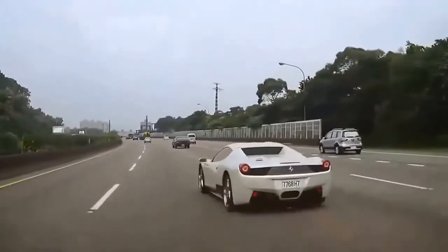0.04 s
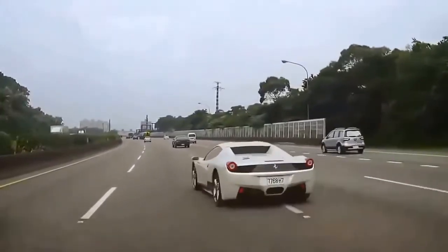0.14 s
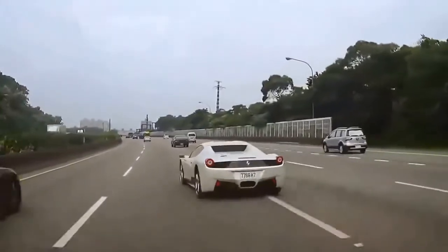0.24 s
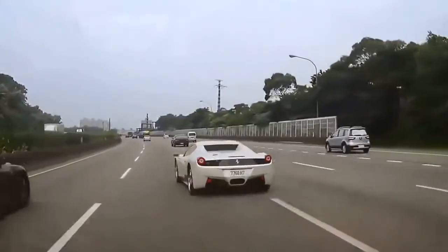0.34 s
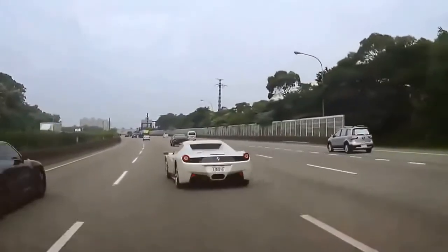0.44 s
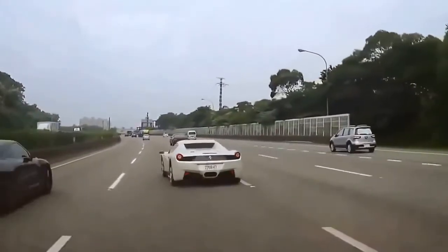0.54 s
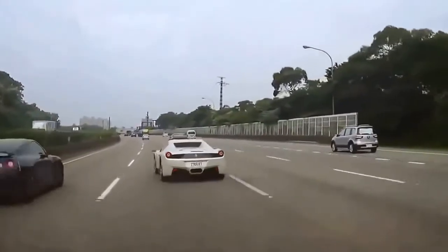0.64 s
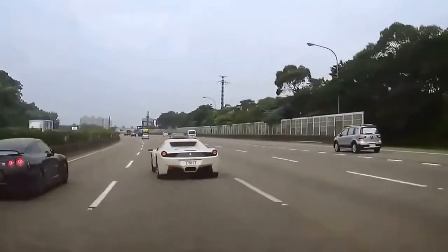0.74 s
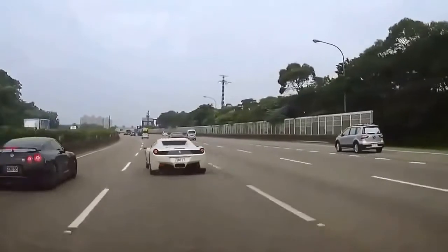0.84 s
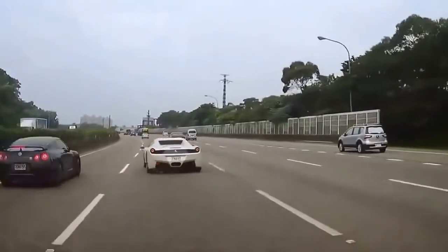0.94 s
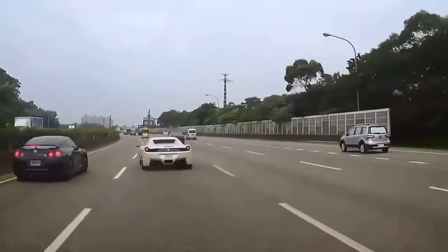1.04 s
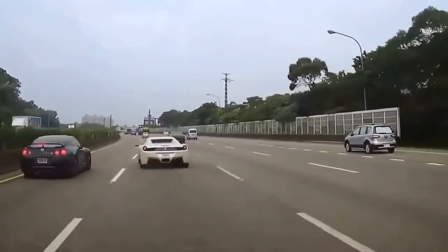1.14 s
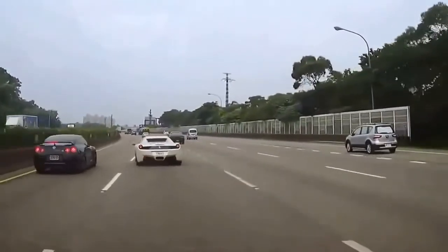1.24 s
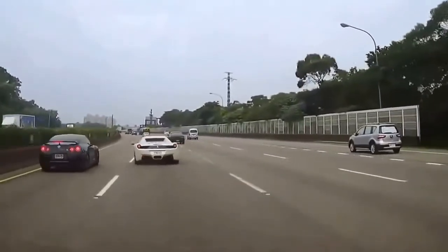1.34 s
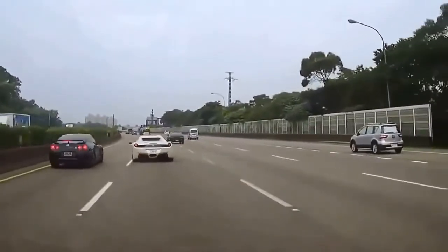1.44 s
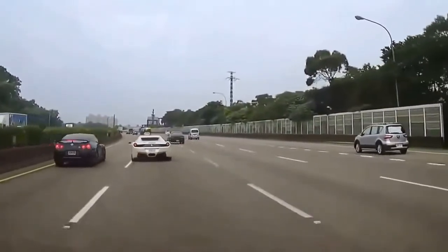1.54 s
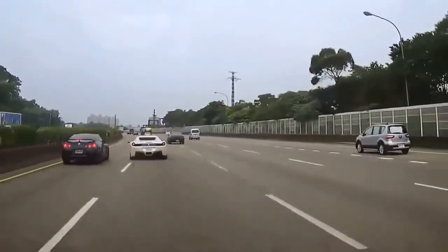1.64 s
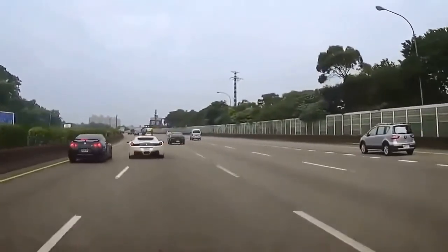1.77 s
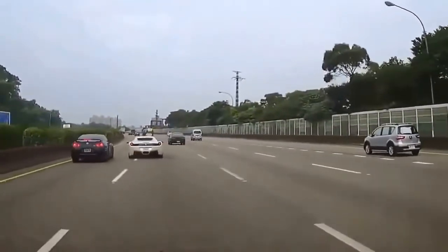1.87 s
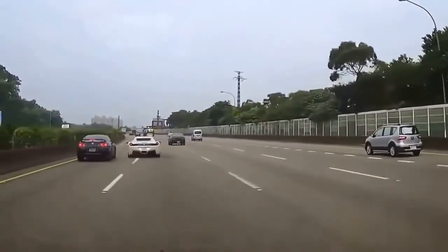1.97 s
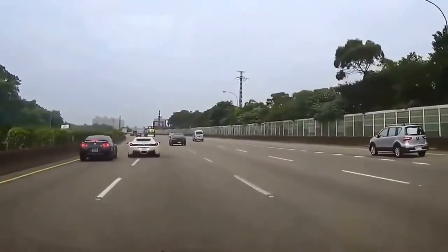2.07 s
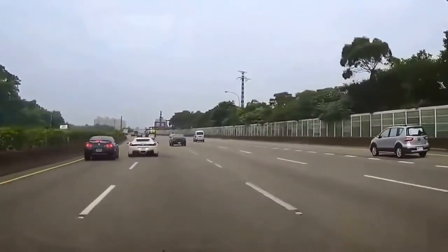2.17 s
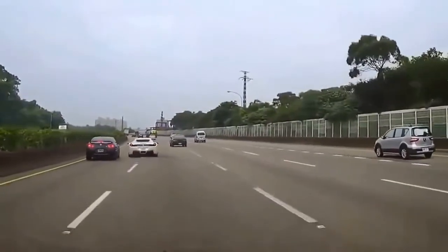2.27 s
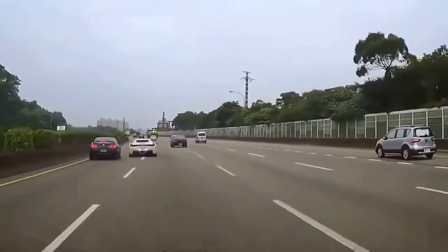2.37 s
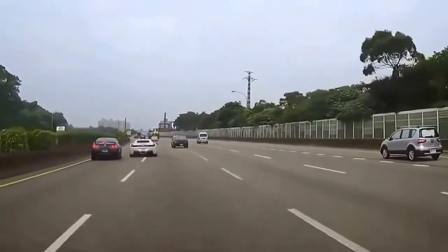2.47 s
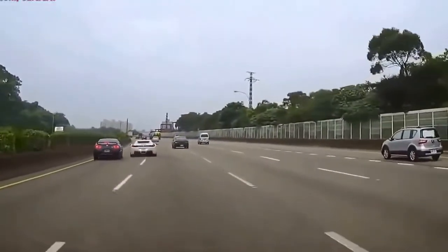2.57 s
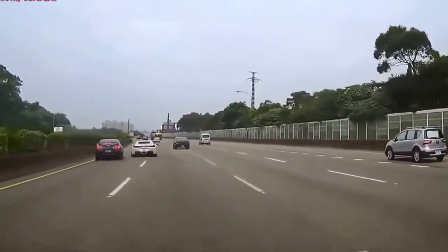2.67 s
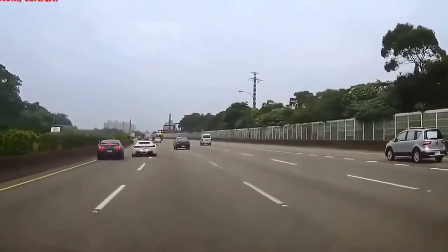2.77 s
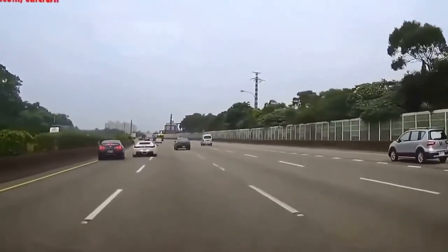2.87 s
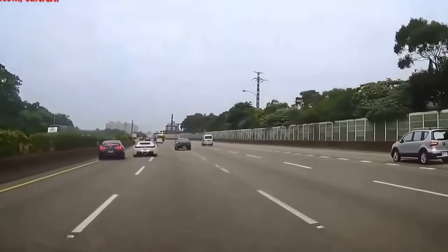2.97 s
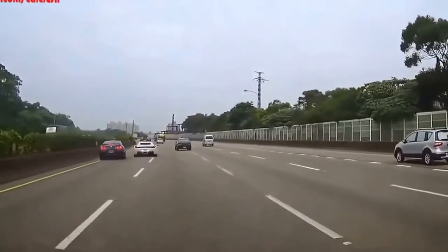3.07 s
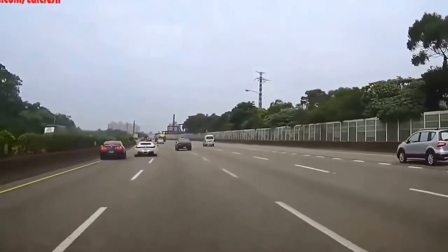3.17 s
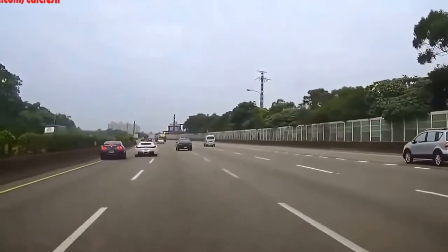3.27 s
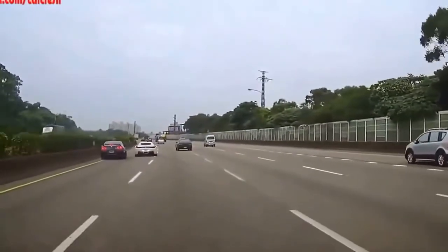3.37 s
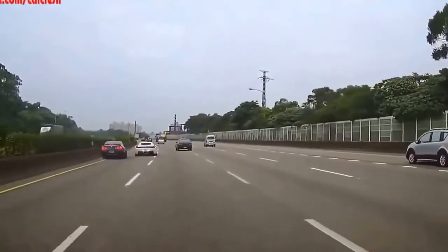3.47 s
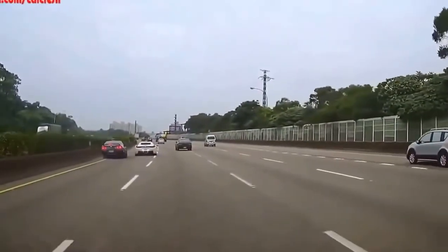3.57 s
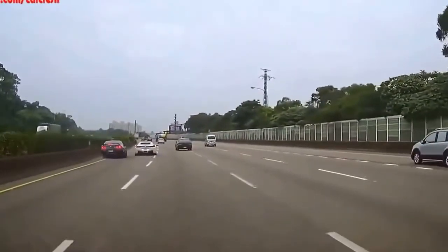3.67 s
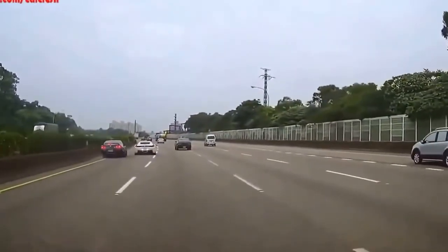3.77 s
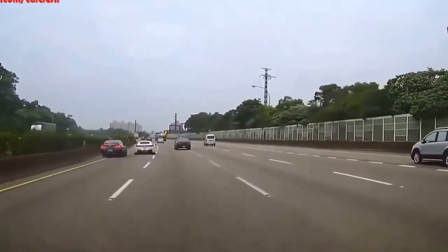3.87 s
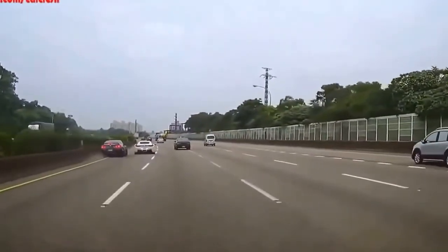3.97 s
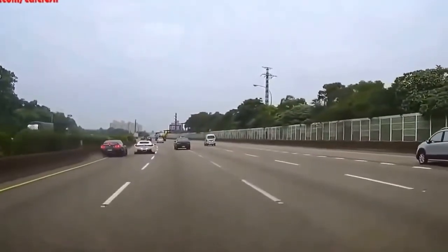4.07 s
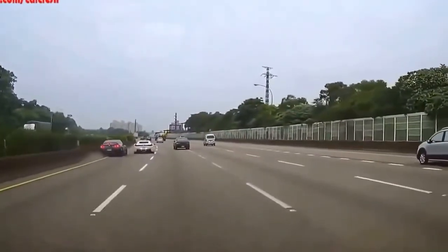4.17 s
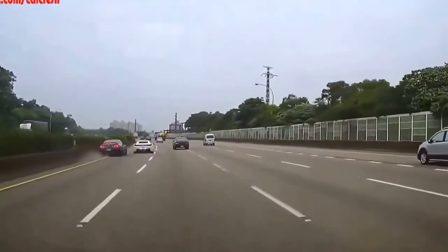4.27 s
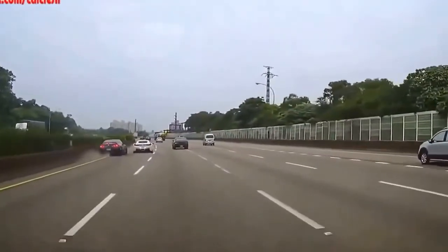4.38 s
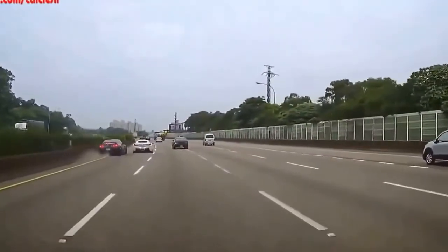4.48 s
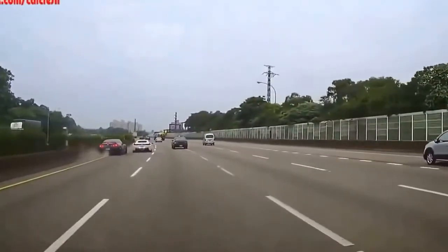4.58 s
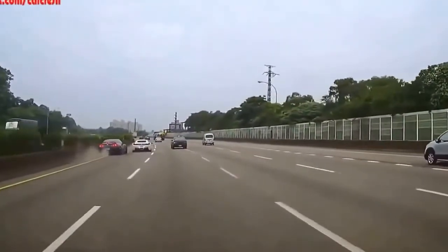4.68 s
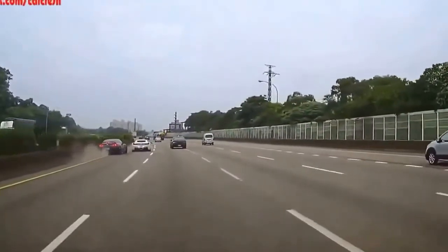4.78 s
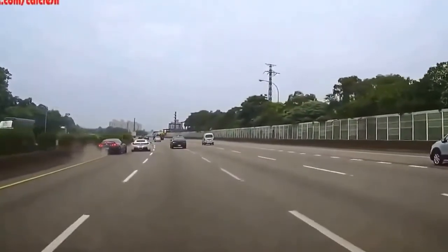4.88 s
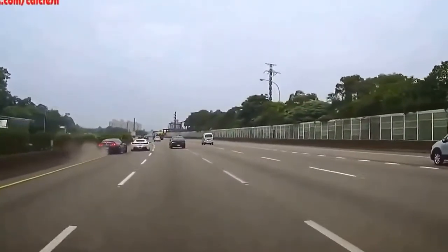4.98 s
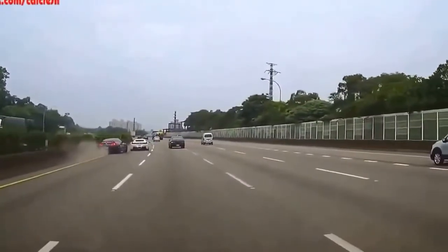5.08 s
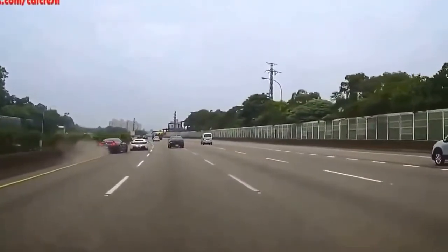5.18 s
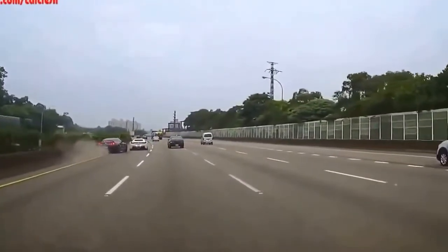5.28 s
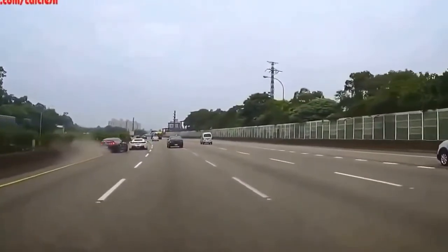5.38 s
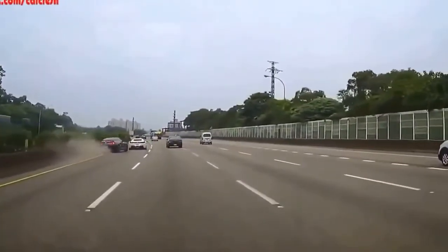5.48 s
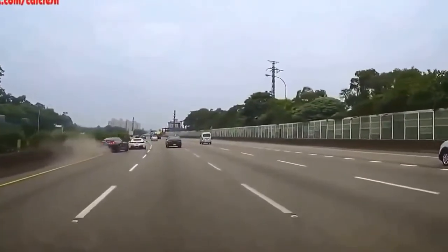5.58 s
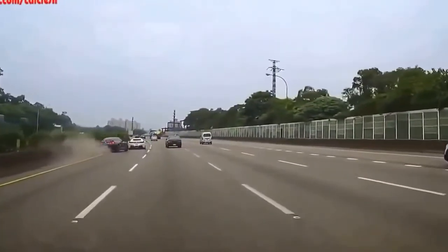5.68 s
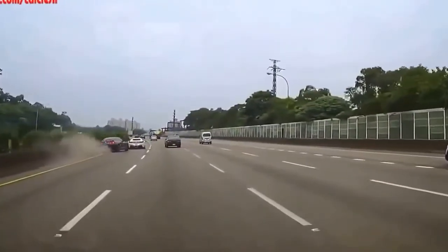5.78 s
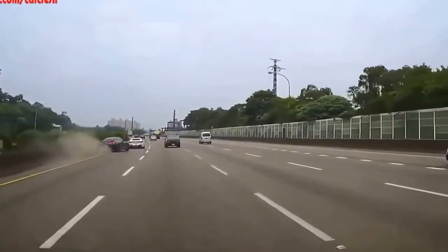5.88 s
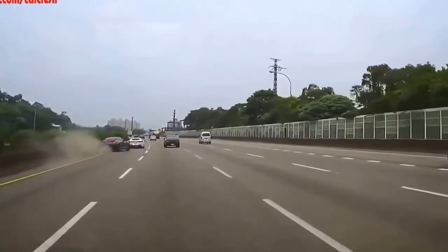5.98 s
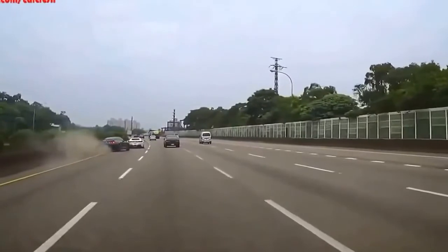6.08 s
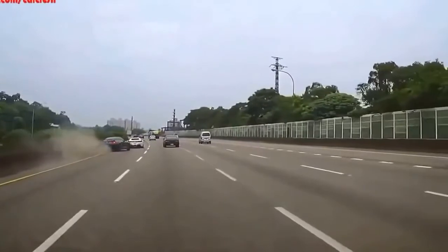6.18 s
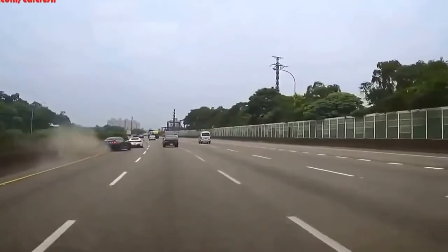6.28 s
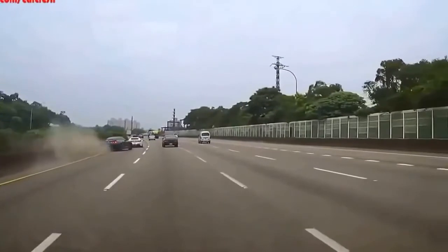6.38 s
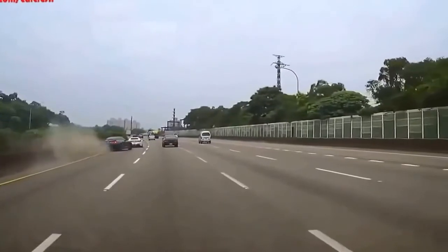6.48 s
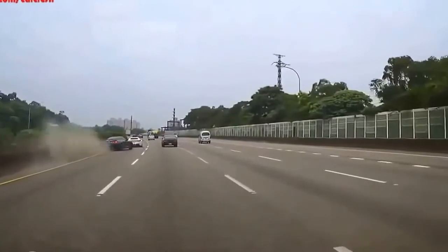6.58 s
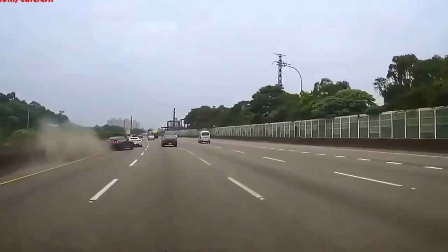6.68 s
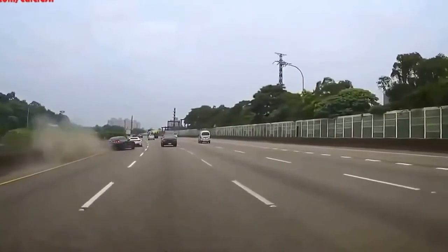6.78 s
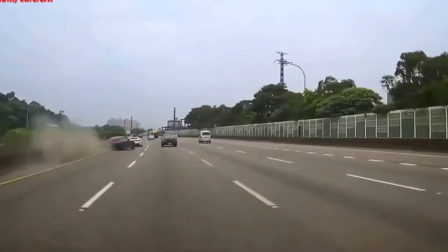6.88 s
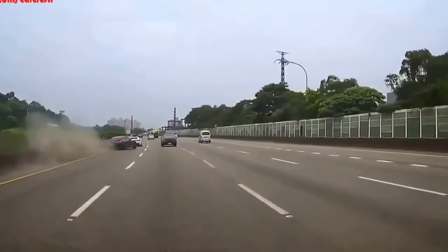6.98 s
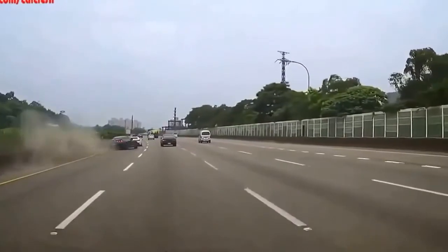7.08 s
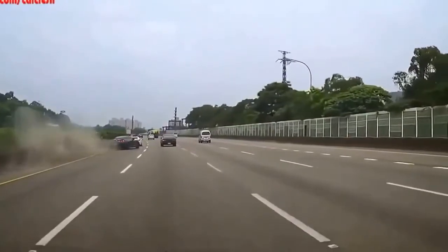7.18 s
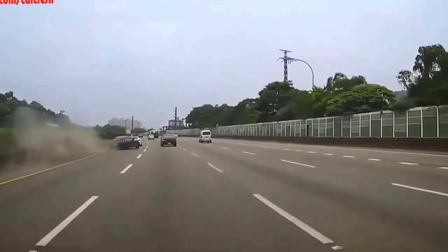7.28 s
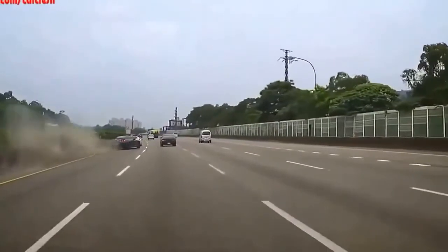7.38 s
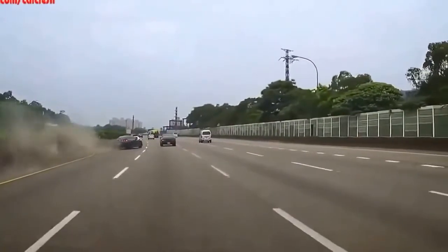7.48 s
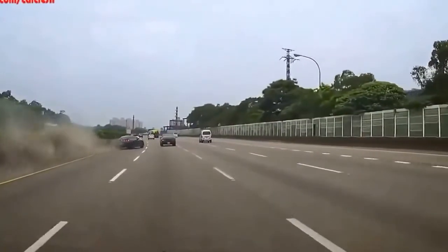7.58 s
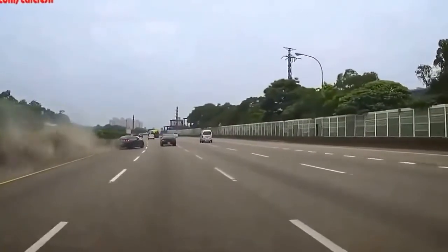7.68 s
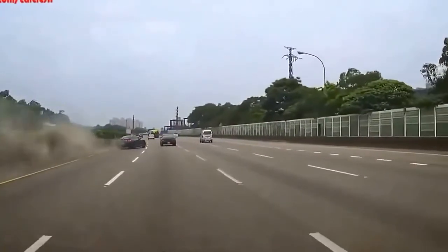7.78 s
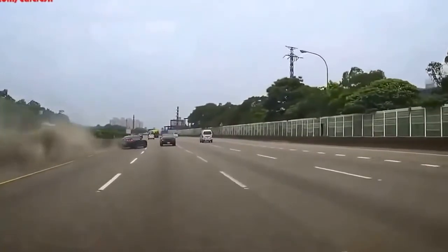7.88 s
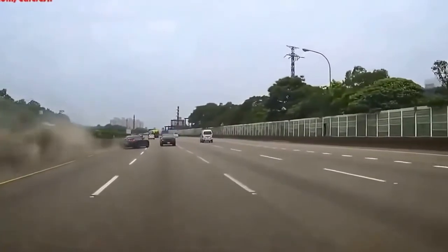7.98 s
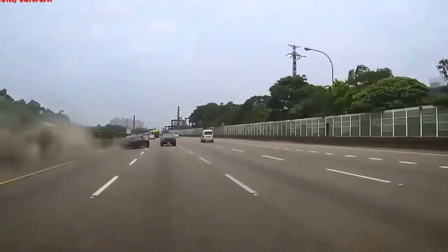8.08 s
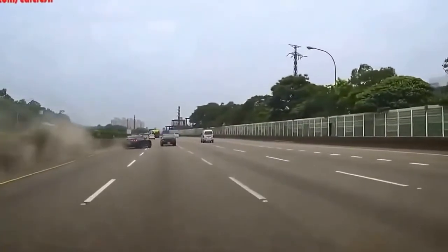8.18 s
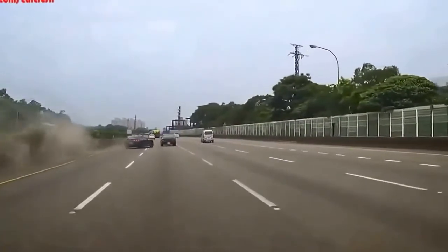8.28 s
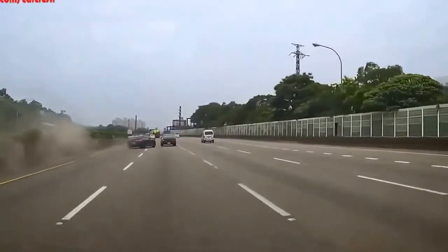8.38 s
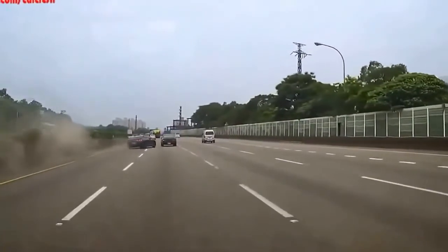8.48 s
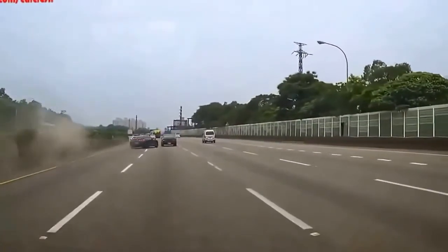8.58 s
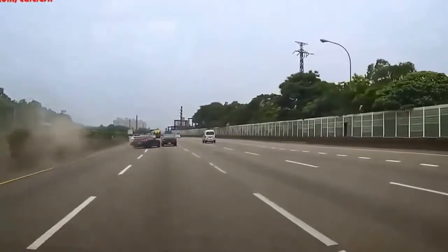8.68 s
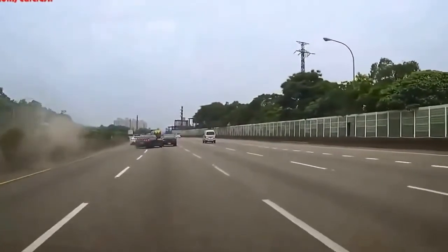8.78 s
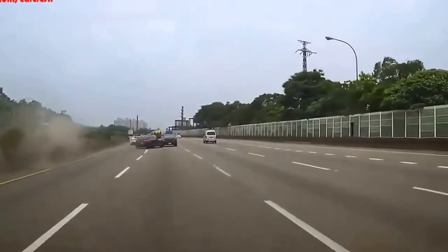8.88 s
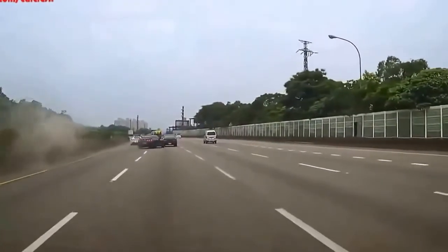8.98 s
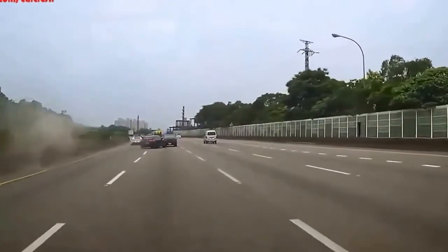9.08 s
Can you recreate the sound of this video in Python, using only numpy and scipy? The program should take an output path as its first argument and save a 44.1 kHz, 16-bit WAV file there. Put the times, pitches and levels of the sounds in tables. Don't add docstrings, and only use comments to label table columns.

```python
import sys
import numpy as np
from scipy import signal
from scipy.fft import rfft, irfft, next_fast_len
from scipy.io import wavfile
from scipy.ndimage import uniform_filter1d

SR = 44100
rng = np.random.default_rng(int(sys.argv[2]) if len(sys.argv) > 2 else 0)


def transcribe(u):
    v = np.clip(np.atleast_2d(u).T, -1, 1)
    q = np.round(v * 32767).astype(np.int16)
    wavfile.write(sys.argv[1], SR, q)


def level_to_linear(level):
    exponent = np.asarray(level, float) / 20
    return 10 ** exponent


N = 402633
CUT_S, SLOW = 3.12524, .5


# (time [s], crank turns [Hz], boom [dB], roar [dB])
LOW_GEAR = [(0, 87.56, -32.5, -19), (.2, 87.86, -25, -23), (.45, 87.45, -29, -24.5),
            (.7, 86.96, -20, -29.5), (.88, 87.3, -30, -33), (1.05, 87.93, -25.5, -32.5),
            (1.2, 88.6, -21, -31), (1.32, 89.54, -27, -32), (1.37, 89.17, -51, -38)]
# (time [s], crank turns [Hz], boom [dB], roar [dB])
HIGH_GEAR = [(1.41, 74.2, -38, -30.5), (1.425, 74.3, -20.5, -26.5), (1.46, 74.2, -23.5, -28),
             (1.5, 73.76, -34, -34.5), (1.62, 73.06, -24.5, -33.5), (2.0, 73.03, -30, -37.5),
             (2.45, 72.7, -30, -36), (2.75, 72.84, -43, -38.5), (3.12, 73.6, -47, -36)]
# (multiple of crank rate, level [dB], share following boom rather than roar [0-1])
CRANK_ORDERS = [(1, -15.5, 0), (2, 0.5, 0.97), (3, -12.5, .5), (4, -6.5, 0.3), (5, -8, 0.07), (6, -8, 0.4),
                (7, -12, 0.05), (8, -12.5, 0), (9, -17, 0), (10, -24.5, 0), (12, -20.5, 0.23)]
# (order, middle [s], length [s], lift [dB])
PIPE_HOWLS = [(8, 0.05, 0.14, 12.5), (3, .1, .3, 7.5), (4, .05, 0.13, 5), (5, 0.032, 0.11, 5.5),
              (6, 0.29, .2, 6), (4, 0.55, .2, 4), (6, .68, .15, 5), (6, 1.08, 0.35, 13),
              (3, 1.12, .45, 11.5), (4, 1.94, 0.45, 10.5), (4, 2.4, .3, 5)]


def engine_lines(crank_hz, boom_db, roar_db):
    turns = 0.1466 + np.cumsum(crank_hz * (1 + 0.0039 * wander(25))) / SR
    lines = np.zeros(N)
    for order, order_db, share in CRANK_ORDERS:
        howl_db = swells([row[1:] for row in PIPE_HOWLS if round(row[0]) == round(order)])
        db = order_db + share * boom_db + (1 - share) * roar_db + howl_db
        flutter_db = 0.32 * order * wander(12)
        lines += level_to_linear(db - 0.5 + flutter_db) * np.sin(2 * np.pi * (order * turns + rng.random()))
    return lines, turns


# (frequency [Hz], density [dB per Hz])
ROAR_COLOUR = [(35, -47.5), (60, -12.5), (114, -24.5), (166, 4.5), (220, -13), (508, -2.5), (585, -0.5),
               (777, -9.5), (850, -13), (1300, -19), (1690, -56), (2860, -120)]
# (frequency [Hz], density [dB per Hz])
RASP_COLOUR = [(530, -31.5), (900, 2), (949, -7.5), (1390, -12), (1590, -5), (1740, -5.5), (1970, -0.5),
               (2190, -13), (2420, -11.5), (2900, -26), (3190, -31.5), (4150, -53), (7020, -120)]
# (middle [s], length [s], lift [dB])
EXHAUST_GUSTS = [(.075, 0.029, 3.5), (.17, 0.072, 3), (.3, 0.073, 3), (.45, 0.037, 1), (.63, 0.14, 4),
                 (1.0, .06, -1), (1.25, 0.1, 4)]


def exhaust_noise(turns, roar_db):
    rasp_db = -31.5 + 1.31 * (roar_db - roar_db[0])
    puff = level_to_linear(1.9 * wander(40)) * np.exp(-(turns % 1) / 0.28)
    surge_db = swells(EXHAUST_GUSTS) + 0.24 * wander(9)
    roar = coloured((0.66 + puff) * rng.standard_normal(N), ROAR_COLOUR)
    rasp = coloured((0.9 + puff) * rng.standard_normal(N), RASP_COLOUR)
    return level_to_linear(surge_db) * (level_to_linear(roar_db - 3) * roar + level_to_linear(rasp_db - 0.5) * rasp)


# (time [s], peak level [dB])
TAILPIPE_CRACKS = [(.009, -26), (0.02, -25), (0.0445, -21), (0.0668, -19), (0.0776, -20), (0.087, -27),
                   (0.1232, -31), (.135, -27.5), (0.1463, -29.5), (.168, -23), (0.183, -32), (0.208, -33)]
# (frequency [Hz], density [dB per Hz])
CRACK_COLOUR = [(500, -24.5), (900, -1), (1500, 2), (2000, -5), (2500, -5.5), (3000, -15.5), (3500, -35.5),
                (3800, -12.5)]


def tailpipe_cracks():
    bursts = np.zeros(N)
    for s, db in TAILPIPE_CRACKS:
        add(bursts, s, level_to_linear(db) * np.exp(-np.arange(800) / SR / 0.004))
    return bursts * coloured(rng.standard_normal(N), CRACK_COLOUR)


# (time [s], peak level [dB], ring [Hz])
SHIFT_POPS = [(1.4153, -10, 200), (1.4245, -16, 270), (1.4285, -18, 540), (1.436, -18, 260),
              (1.4425, -19, 160), (1.45, -21, 500), (1.463, -23, 260), (1.47, -23, 200), (1.477, -24, 420),
              (1.484, -23, 560)]


def shift_pops():
    pops = -rings([(s, db, hz, .04) for s, db, hz in SHIFT_POPS], .0006)
    return signal.sosfilt(signal.butter(4, 120, "high", fs=SR, output="sos"), pops)


def sports_car():
    crank_hz, boom_db, roar_db = curves(LOW_GEAR + HIGH_GEAR)
    lines, turns = engine_lines(crank_hz, boom_db, roar_db)
    return lines + exhaust_noise(turns, roar_db) + tailpipe_cracks() + shift_pops()


# (middle [s], length [s], firing rate [Hz], level [dB])
NEIGHBOUR_REVS = [(.05, 0.53, 572, -32), (.28, 0.19, 588.7, -36.5), (1.25, .12, 595, -37),
                  (2.65, 0.62, 570, -48)]


def neighbour_car():
    return tone(*flares(NEIGHBOUR_REVS, -53), drift_hz=4, flutter_db=4.9)


# (frequency [Hz], density [dB per Hz])
ROAD_COLOUR = [(8.8, -50.5), (15, -21), (38, -26.5), (76, -6.5), (164, -4.5), (231, -3), (289, -2.5),
               (320, -11), (460, -16.5), (575, -16), (636, -25.5), (954, -28), (1060, -33.5), (1650, -45),
               (1900, -53), (2470, -84.5), (4180, -120)]
# (frequency [Hz], width [Hz], level [dB])
CABIN_MODES = [(86.1, 7.4, 6.5), (105, 14, -5.5), (150, 20, 6), (252, 18, -1.5), (306, 41, -0.5),
               (475, 39, 2.5), (570, 44, -1.5), (700, 19, -0.5)]
# (frequency [Hz], full-speed level [dB], slowed level [dB],
# share of a swell, share of a thump, random drift [dB])
ROAD_LAYERS = [
    (70, 1, -3.5, -0.38, 0.87, 1.5),
    (220, -2.5, 0, 1, -0.22, 0.3),
    (600, -1, -1, 0.18, 0.19, .5),
]
# (middle [s], length [s], lift [dB])
CAR_WASH = [(0, 1.6, 8), (1.5, 1.6, 1.5)]
# (middle [s], length [s], lift [dB])
COARSE_ASPHALT = [(4.6, 0.14, 1.7), (6.0, 0.89, 2), (7.9, 1.2, 2.6), (9.13, .1, 3.8)]
# (middle [s], length [s], lift [dB])
JOINTS_FAST = [(.8, 0.17, 4), (1.253, 0.26, 3.5), (2.103, .3, 3.5)]
# (middle [s], length [s], lift [dB])
JOINTS_SLOW = [(3.28, 0.16, 4.8), (4.0, 0.27, 6), (4.45, 0.19, 8), (4.95, 0.27, 7), (5.49, 0.21, 12),
               (5.9, 0.28, 2.9), (7.2, 0.14, 3.6), (8.05, 0.23, 3), (9.0, .3, 3.5)]


def road(lifts, thumps, speed):
    frames, hz = N // 512 + 5, np.fft.rfftfreq(2048, speed / SLOW / SR)
    real, imaginary, patches = rng.standard_normal((frames, 1025, 3)).T
    patches = uniform_filter1d(patches, size=5, axis=0)
    patches = evened(uniform_filter1d(patches, size=8, axis=1))
    colour_db = read(ROAD_COLOUR, hz)
    colour_db = colour_db + sum(0.42 * db / (1 + (2 * (hz - f) / w) ** 2) for f, w, db in CABIN_MODES)
    colour_db = colour_db - 10 * np.log10(np.sum(level_to_linear(2 * colour_db)))

    at = np.minimum(np.arange(frames) * 512, N - 1)
    lift_db, thump_db = swells(lifts), swells(thumps)
    layers_db = []
    for _, fast, slow, share, shake, drift in ROAD_LAYERS:
        level_db = fast if speed == 1 else slow
        change_db = level_db + share * lift_db + shake * thump_db + drift * wander(3.0)
        layers_db.append(change_db[at])
    layer_hz = np.log([row[0] for row in ROAD_LAYERS])
    change_db = np.array([np.interp(np.log(hz + 1), layer_hz, row) for row in np.transpose(layers_db)]).T
    spectra = (real + 1j * imaginary) * level_to_linear(colour_db[:, None] + change_db + 0.85 * patches)
    return level_to_linear(-28.5 - 0.46) * signal.istft(spectra, nperseg=2048, noverlap=1536)[1][:N]


def cabin_boom():
    return whine(81.2 * np.ones(N), -43 + .5 * swells(JOINTS_SLOW), 14)


# (middle [s], length [s], pitch [Hz], level [dB])
TYRE_DRONES = [(3.6, 0.25, 225, -38.5), (4.2, .4, 150, -40), (5.33, 0.14, 233.8, -34.5),
               (6.5, 0.46, 159.4, -39.5), (7.5, .6, 187.3, -36), (8.25, .7, 244.9, -34.5),
               (8.9, .3, 220, -34.5)]


def tyre_drones():
    return whine(*flares(TYRE_DRONES, -60.5), 18)


# (middle [s], length [s], pitch [Hz], level [dB])
WHINE_FAST = [(.15, .5, 1977, -48.5), (.98, 0.18, 1944, -48), (1.25, 0.11, 1938, -54),
              (2.4, 0.57, 1910, -60.5)]


def tread_fast():
    return whine(*flares(WHINE_FAST, -64.5), 90)


# (middle [s], length [s], pitch [Hz], level [dB])
WHINE_HIGH = [(4.8, 0.46, 937, -57.5), (6.1, 1.4, 971, -58), (6.85, .5, 963, -56), (7.5, 0.22, 975, -51),
              (8.9, 0.46, 950, -63)]
# (middle [s], length [s], pitch [Hz], level [dB])
WHINE_LOW = [(3.15, 0.37, 880, -57), (4.35, .6, 884, -59), (7.2, 0.55, 905, -55.5), (7.55, 0.26, 896, -54),
             (8.85, 0.54, 893, -62)]


def tread_slow():
    low = tone(*flares(WHINE_LOW, -67.5), drift_hz=3, flutter_db=1.9)
    return whine(*flares(WHINE_HIGH, -63.5), 22) + low


# (time [s], peak level [dB], ring [Hz], t60 [s])
TRIM_RATTLES = [(7.99, -39, 830, .16), (8.05, -39, 770, .16), (9.029, -24, 950, .06),
                (9.033, -31, 1220, .05), (9.052, -33, 930, .04), (9.06, -37, 1400, .03),
                (9.067, -31, 1020, .035)]


def trim_rattles():
    return rings(TRIM_RATTLES, 0.0022)


# (frequency [Hz], density [dB per Hz])
SCUFF_NOISE = [(500, -30), (800, -2), (1000, 2), (1300, -15), (1650, -18), (1900, -38), (2500, -92)]


def scuff():
    start_s, level_db, attack_s, t60_s = 9.028, -36.5, .01, 0.28
    t = np.maximum(np.arange(N) / SR - start_s, 0)
    shape = np.minimum(t / attack_s, 1) * level_to_linear(level_db - 60 * t / t60_s)
    return shape * coloured(rng.standard_normal(N), SCUFF_NOISE)


# (middle [s], length [s], pitch [Hz], level [dB])
GEAR_HUM = [(4.4, 0.25, 711, -64.5), (7.4, 0.36, 700, -64.5), (7.8, .4, 688, -60), (8.55, 0.35, 700, -59)]


def drivetrain_hum():
    return tone(*flares(GEAR_HUM, -69.5), drift_hz=3.7, flutter_db=1.8)


# (frequency [Hz], density [dB per Hz])
HISS_COLOUR = [(20, 2), (3600, 0.5), (3830, -15.5), (3915, -27.5), (4000, -12.5), (4200, -0.5), (4500, 2),
               (7630, 1.5), (7690, -21.5), (8400, -26), (8600, -32.5)]


def converter_hiss():
    colour = HISS_COLOUR + [(22000, -57)]
    fast, slow = [coloured(rng.standard_normal(N), colour, speed) for speed in (1, SLOW)]
    hiss = np.where(np.arange(N) <= int(CUT_S * SR), fast, slow)
    return level_to_linear(-63) * hiss + level_to_linear(-90.5) * rng.standard_normal(N)


def evened(x):
    return x / np.sqrt(np.mean(x ** 2) + 1e-20)


def read(points, hz):
    f, value = np.transpose(points)
    return np.interp(np.log(hz + 1), np.log(f + 1), value)


def curves(rows):
    s, *columns = np.transpose(rows)
    return [np.interp(np.arange(N) / SR, s, column) for column in columns]


def coloured(x, points, speed=1):
    size = next_fast_len(N)
    gain = level_to_linear(read(points, np.fft.rfftfreq(size, speed / SR)))
    return evened(irfft(rfft(x, size) * gain, size)[:N])


def wander(rate_hz):
    lowpass = signal.butter(2, rate_hz, fs=SR / 64, output="sos")
    coarse = signal.sosfilt(lowpass, rng.standard_normal(N // 64 + 2))
    return np.interp(np.arange(N) / 64, np.arange(len(coarse)), evened(coarse))


def tone(hz, db, drift_hz, flutter_db):
    level = np.sqrt(2) * level_to_linear(db + flutter_db * wander(36))
    return level * np.sin(2 * np.pi * np.cumsum(hz + drift_hz * wander(16)) / SR)


def whine(hz, db, width_hz):
    lowpass = signal.butter(2, width_hz / 2, fs=SR, output="sos")
    slow = signal.sosfilt(lowpass, rng.standard_normal((2, N)))
    carrier = np.exp(2j * np.pi * np.cumsum(hz) / SR)
    return level_to_linear(db) * evened((carrier * (slow[0] + 1j * slow[1])).real)


def add(mix, s, sound):
    part = mix[round(s * SR):][:len(sound)]
    part += sound[:len(part)]


def rings(rows, rise_s):
    mix, t = np.zeros(N), np.arange(8000) / SR
    for s, db, hz, t60 in rows:
        shape = level_to_linear(db - 60 * t / t60) * (1 - np.exp(-t / rise_s))
        add(mix, s, shape * np.sin(2 * np.pi * hz * t))
    return mix


def swells(rows):
    t = np.arange(N) / SR
    return sum(height * np.exp(-(2 * (t - s) / length) ** 2) for s, length, height in rows)


def flares(rows, rest_db):
    s, length, hz, db = np.transpose(rows)
    power = level_to_linear(2 * rest_db) + swells(zip(s, length, level_to_linear(2 * db)))
    return np.interp(np.arange(N) / SR, s, hz), 10 * np.log10(power)


def scene():
    cars = sports_car() + neighbour_car() + tread_fast()
    band_edge = signal.ellip(8, .5, 70, 3520, fs=SR, output="sos")
    fast = signal.sosfilt(band_edge, cars) + road(CAR_WASH, JOINTS_FAST, 1)
    slow = road(COARSE_ASPHALT, JOINTS_SLOW, SLOW) + cabin_boom() + tyre_drones() + tread_slow()
    slow = slow + trim_rattles() + scuff() + drivetrain_hum()
    return np.where(np.arange(N) < CUT_S * SR, fast, slow)[None]


def band_limit(x):
    return signal.sosfilt(signal.butter(12, 15400, fs=SR, output="sos"), x)


def record(dry):
    start_step, cut_step, end_step = -.31, .03, -.033
    n, cut = np.arange(N), int(CUT_S * SR)
    x = dry[0] + converter_hiss()
    x = x + (start_step - x[0]) * np.exp(-(n / 80) ** 2) * np.cos(2 * np.pi * 450 * n / SR)
    x = x + (end_step - x[-1]) * np.exp(-((N - 1 - n) / 60) ** 2)
    near_cut = np.exp(-((n - cut) / 60) ** 2)
    x = x + np.where(n <= cut, cut_step - x[cut], -x[cut + 1]) * near_cut
    return band_limit(x[None])


dry = scene()
out = record(dry)
transcribe(out)
```